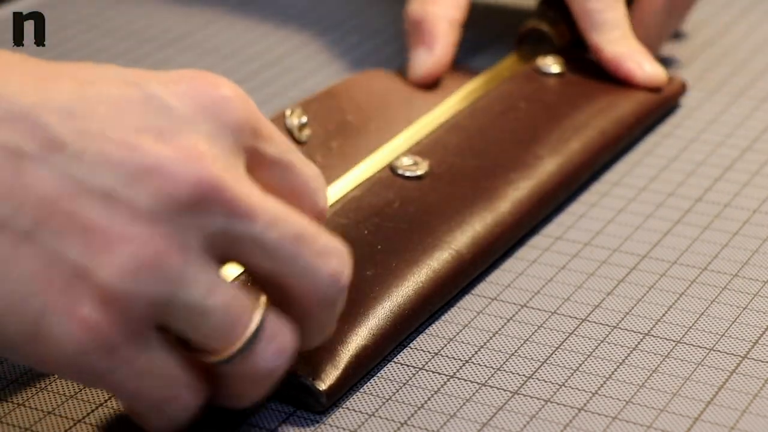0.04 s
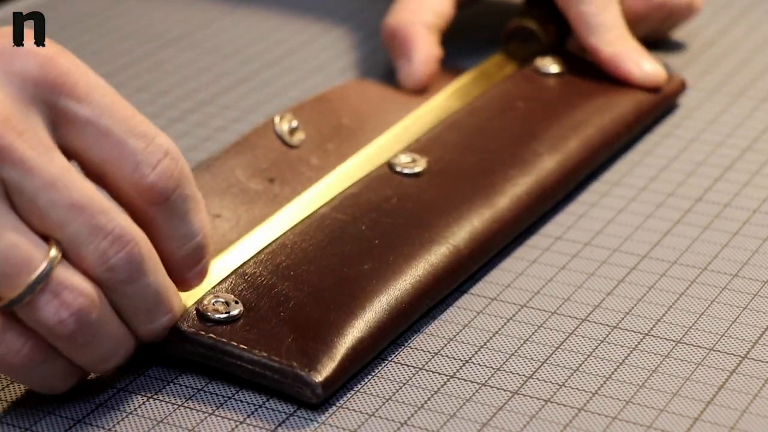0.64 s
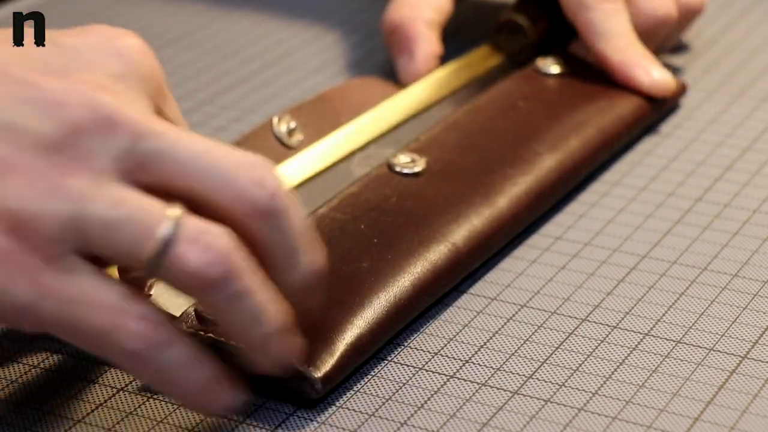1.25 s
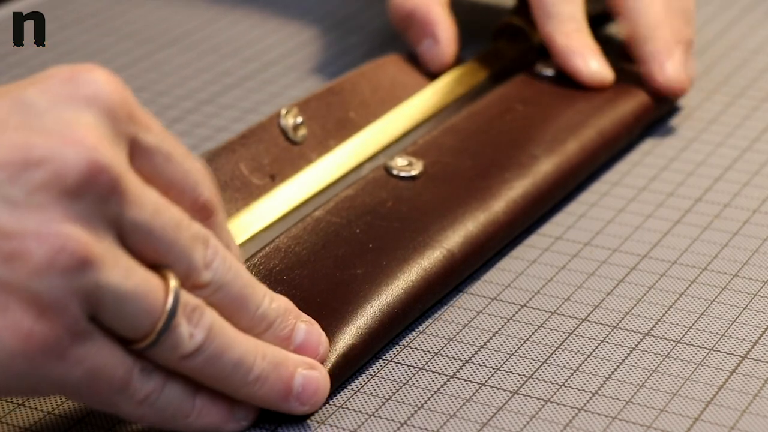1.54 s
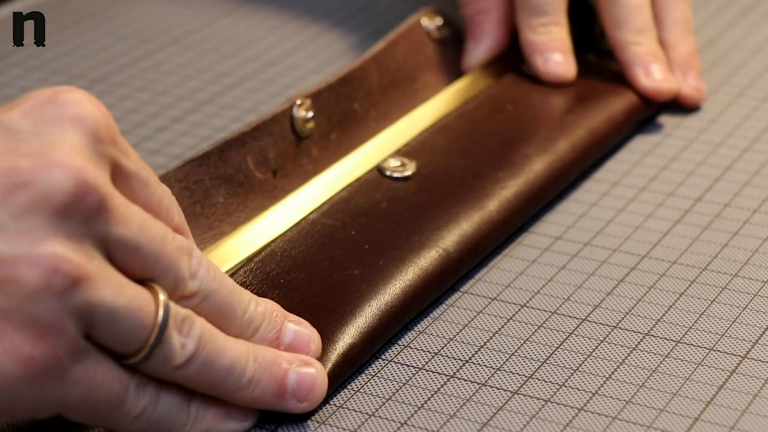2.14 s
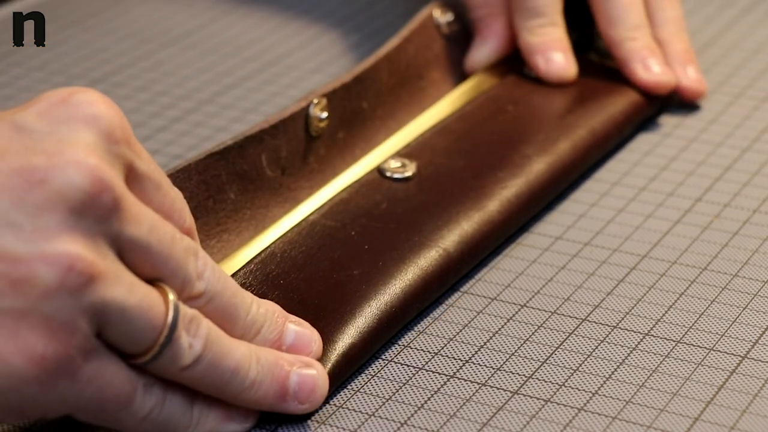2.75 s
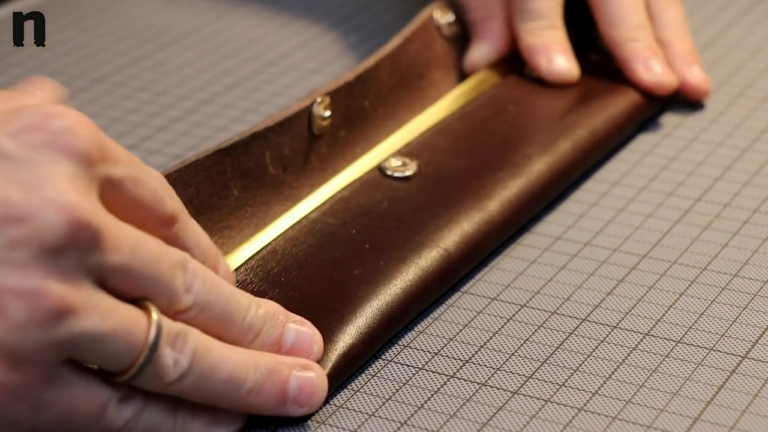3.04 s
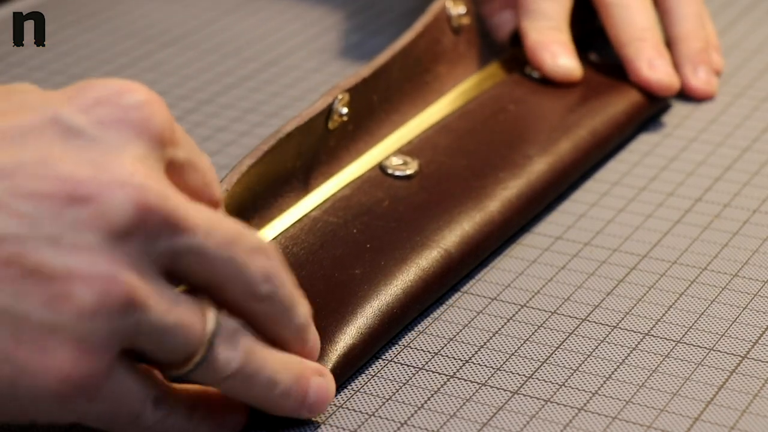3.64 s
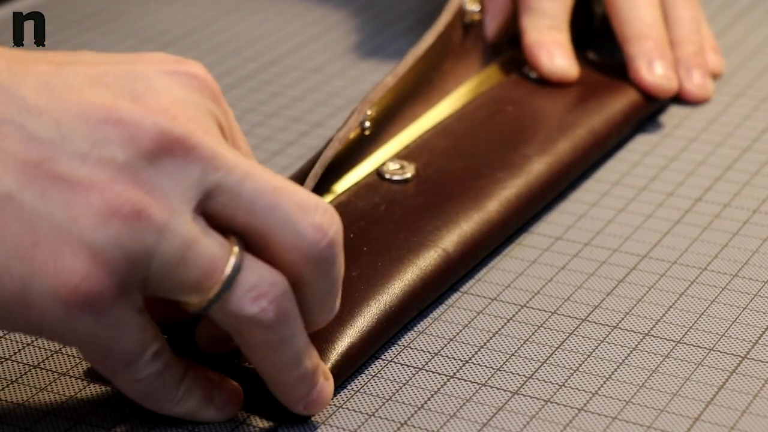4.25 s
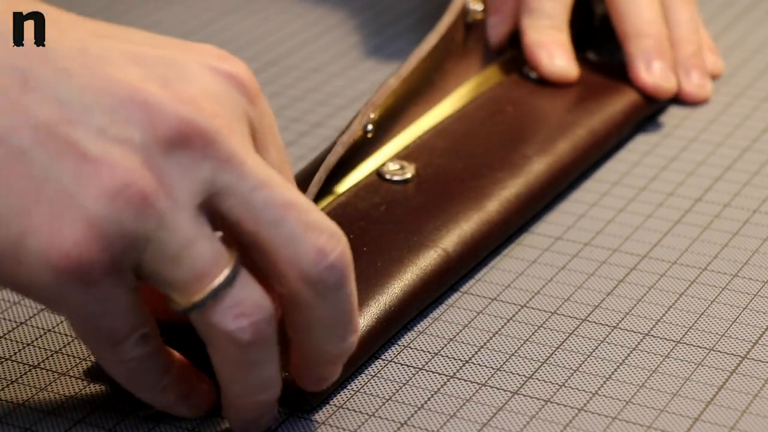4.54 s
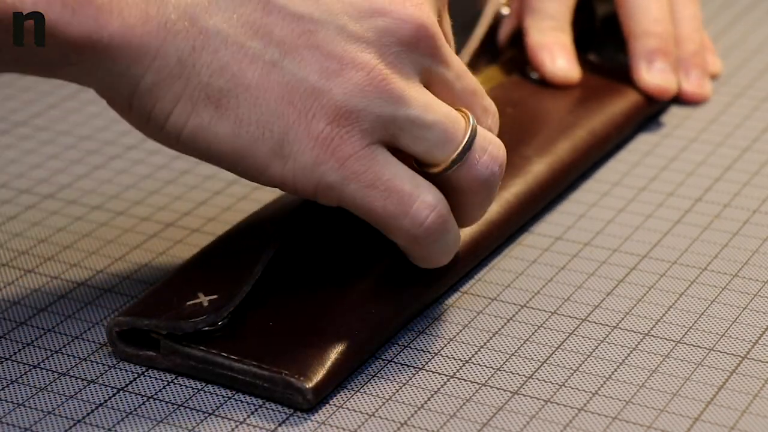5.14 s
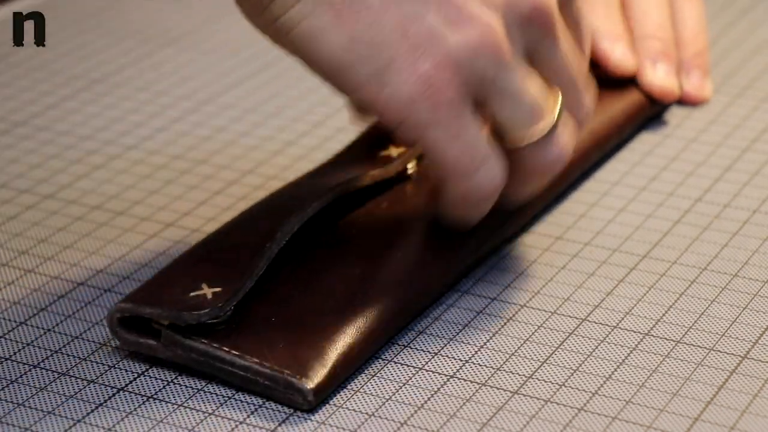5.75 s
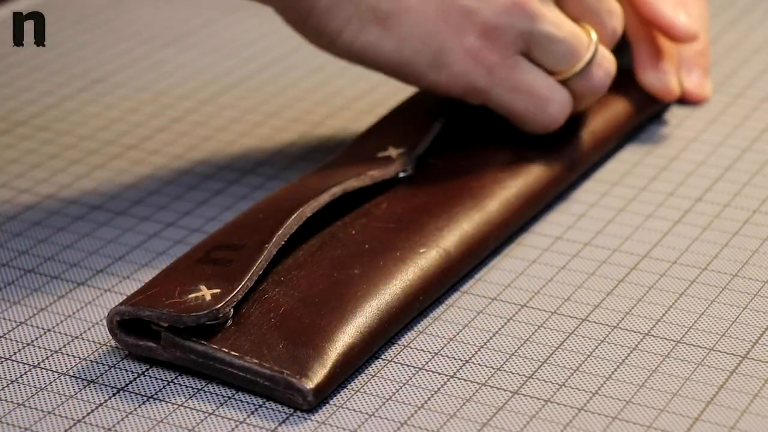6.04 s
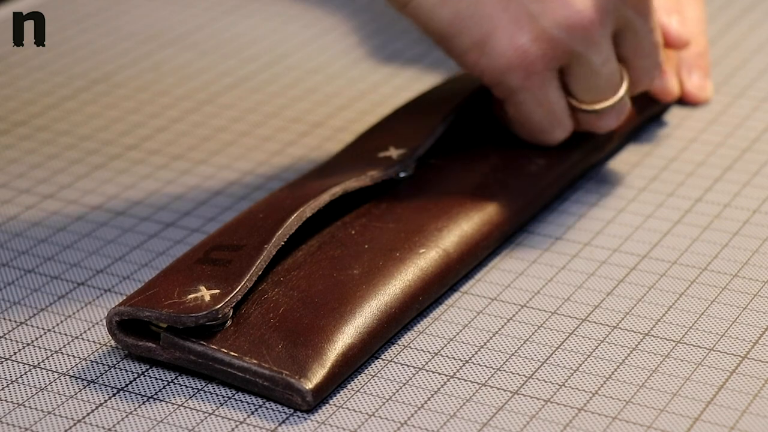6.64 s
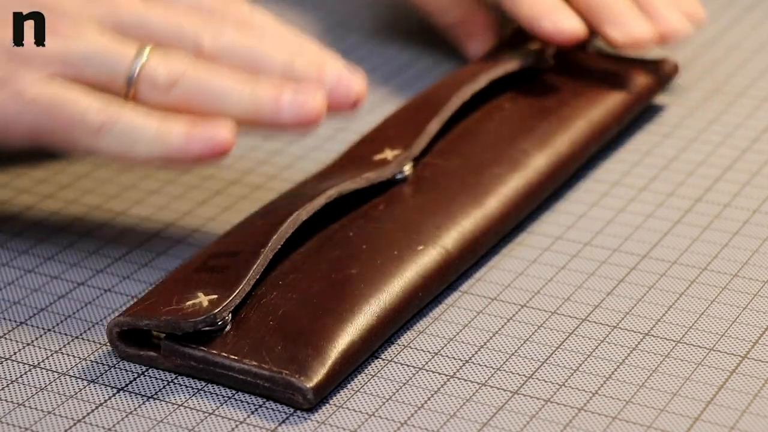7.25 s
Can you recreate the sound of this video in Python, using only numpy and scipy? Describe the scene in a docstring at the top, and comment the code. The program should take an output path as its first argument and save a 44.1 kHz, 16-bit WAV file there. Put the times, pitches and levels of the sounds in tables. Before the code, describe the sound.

A saw blade clinks lightly as it settles into a leather sheath, while hands brush and tap the leather and shift it on a mat. In the second half, three press studs are closed one after another with sharp clicks, the last the loudest, and a hand knocks the sheath once more. The microphone is close, in a small workshop with a quiet hum and a slight echo.

```python
"""Fingers rub and pat a leather sheath on a cutting mat, close up; the brass-backed saw inside clinks
as it settles. Skin slips on the grain, bent leather ticks, the blade scrapes and the sheath rumbles
on the mat. Then three press studs snap shut one by one, each spring slamming its cap home.
A small workshop with a low hum answers each click."""
import sys
import numpy as np
from scipy import signal
from scipy.fft import rfft, irfft
from scipy.io import wavfile
from scipy.ndimage import uniform_filter1d, map_coordinates

SR = 44100
rng = np.random.default_rng(int(sys.argv[2]) if len(sys.argv) > 2 else 0)


def digitize_waveform(pressure):
    """Quantize a signal to 16-bit integers and store it at the path in sys.argv[1].

    Rows of a 2-D input are taken as channels; values are limited to [-1, 1].
    """
    field = np.atleast_2d(pressure).T
    bounded = np.clip(field, -1, 1)
    quanta = np.round(bounded * 32767).astype(np.int16)
    wavfile.write(sys.argv[1], SR, quanta)


N = 321922
GRID_HZ = np.fft.rfftfreq(4096, 1 / SR)


# stud closures: t/s, level/dB, contact t60/s, room send/dB
SNAPS = [(4.5401, -12.5, .015, -7), (5.5883, -6, 0.0055, -7), (6.6914, -3, 0.0048, -10)]
# per stud, with the leather and air around it: f/Hz, half width/Hz, level/dB
STUD_MODES = [
    [(330, 480, -16), (1220, 130, -2), (1590, 260, -3), (2800, 430, -11), (3420, 520, -12.5),
     (4470, 160, -12), (6330, 830, -14), (8330, 1060, -8), (9660, 360, -10), (11200, 750, -6.5),
     (13260, 920, -13)],
    [(290, 150, -15), (917, 130, -1.5), (1180, 210, -0.5), (1700, 460, -8), (3030, 210, -2.5),
     (3630, 190, -3), (4270, 420, -1), (5220, 530, -2.5), (6310, 880, -5), (7640, 220, -6),
     (9070, 2200, -10), (13400, 1110, -4)],
    [(264, 26, -11.5), (860, 133, -4.5), (1325, 130, 1), (1550, 290, -4.5), (2300, 170, -13),
     (2770, 260, -7.5), (3470, 410, -5.5), (4270, 430, -6), (5650, 160, -8.5), (7800, 1050, -7.5),
     (9150, 720, -12.5), (13400, 2300, -13)],
]
# slightly thinner low end of every snap: f/Hz, level/dB
STUD_TILT = [(320, 0.5), (450, 1.5), (620, 3.5)]

def studs():
    """The spring of each stud jumps over its post and slams the cap home."""
    out = np.zeros(N)
    for (s, db, t60, wet_db), modes in zip(SNAPS, STUD_MODES):
        snap = contact(resonances(modes) * colour(STUD_TILT), t60)
        add(out, s, in_room(amp(db) * snap, wet_db))
    return out


# cap on its post: f/Hz, half width/Hz, level/dB
CAP_MODES = [(1330, 270, -1), (1870, 140, 2), (3040, 530, -10), (4200, 180, -14)]

def cap_seating():
    """The last cap finds its post with a small dry click before it is pressed home."""
    out = np.zeros(N)
    click = amp(-20.5) * contact(resonances(CAP_MODES), t60=0.0014)
    add(out, s=6.027, x=in_room(click, wet_db=-14))
    return out


# fingers and flap landing: t/s, relative level/dB, thump trim/dB, contact t60/s
PATS = [(0.096, -26, -32, 0.031), (.115, -21.5, -30, 0.045), (0.271, -33.5, -8.5, 0.017),
        (.987, -26, -16, 0.014), (1.152, -33, -28, 0.015), (1.458, -18.5, -23.5, 0.059),
        (1.513, -29.5, -22, 0.031), (1.889, -33, -23, 0.023), (1.898, -30, -27, 0.018),
        (2.108, -35.5, -12, 0.036), (3.152, -33.5, -59, 0.026), (3.23, -39, -8, .02),
        (4.207, -38, -18, 0.02), (4.4182, -23.5, -13.5, 0.028), (4.694, -38, -14, .015),
        (4.969, -35.5, -10.5, 0.046), (4.999, -36, -25, 0.014), (5.132, -34, -12, 0.026),
        (5.454, -31.5, -18.5, 0.0067), (5.745, -31, -17, 0.0096), (6.487, -39, -27, .015),
        (6.548, -31, -34, 0.023), (6.565, -31, -19, 0.0095), (6.824, -31, -39, 0.024),
        (6.977, -32, -13, 0.047), (7.001, -38, -9.5, 0.039), (7.273, -34, -18, 0.014),
        (7.292, -23, -12.5, 0.017), (7.296, -14, -9.5, .012)]
# leather knock, mat thump and grain crackle: f/Hz, level/dB
LEATHER_SPECTRUM = [(200, -44), (500, -25), (800, 5.5), (1050, 1.5), (1450, 3.5), (1800, -4), (2250, -12),
                    (2800, -23.5), (4200, -12), (8000, -65), (16000, -56)]
MAT_SPECTRUM = [(40, -47), (100, -15.5), (170, 6.5), (300, -5), (450, -6.5), (900, -21.5), (3000, -93)]
CRACKLE_SPECTRUM = [(1000, 1.5), (3000, 1.5), (4500, 1.5), (7000, -5), (8700, 3.5), (10500, -15),
                    (13500, -6), (16000, -25)]

def pats():
    """Each pat knocks the stiff leather, thumps the mat under it and crackles on the grain."""
    out = np.zeros(N)
    for s, db, thump_db, t60 in PATS:
        # the knock deepens as the studs close the sheath
        pitch_ratio = np.interp(s, [SNAPS[0][0], SNAPS[-1][0]], [1.06, 0.85])
        pitch_ratio *= np.exp(0.035 * rng.standard_normal())
        knock = contact(colour(np.multiply(LEATHER_SPECTRUM, [pitch_ratio, 1])), t60)
        thump = amp(thump_db + 15.5) * contact(colour(MAT_SPECTRUM), t60=0.031)
        crackle = amp(-12.5) * contact(colour(CRACKLE_SPECTRUM), t60)
        add(out, s, in_room(amp(db - 3.5) * (knock + thump + crackle), wet_db=-8.5))
    return out


# saw knocking against a stud: t/s, level/dB
CLINKS = [(0.4415, -23.5), (0.5511, -30), (0.677, -41.5), (0.794, -42.5)]
# blade modes: f/Hz, level/dB, t60/s
BLADE_MODES = [(2370, -5, 0.02), (2820, -14, 0.019), (3550, -14.5, 0.022), (3560, 1.5, 0.018),
               (3690, -10, 0.051), (4030, -16, .016), (4230, -4.5, 0.024), (4640, -16, 0.026),
               (5350, -13, 0.014), (7300, -29, 0.026), (8920, -27.5, 0.013)]

def saw_clinks():
    """The blade rings briefly, damped by the leather; a moment later its weight thuds on the bench."""
    out, t = np.zeros(N), np.arange(SR // 4) / SR
    bench = resonances([(352, 116, 0)])
    attack = 1 - np.exp(-t / 0.00044)
    for s, db in CLINKS:
        ring = np.zeros(len(t))
        for hz, mode_db, t60 in BLADE_MODES:
            decay = amp(mode_db + rng.normal(0, 1.5) - 60 * t / t60)
            ring += decay * np.sin(2 * np.pi * (hz * t + rng.random()))
        add(out, s, in_room(amp(db) * ring * attack, wet_db=-11))
        thud = amp(db + 1.5) * contact(bench, t60=0.02)
        add(out, s + 0.0041, in_room(thud, wet_db=-8))
        knock = amp(db - 9) * contact(colour(LEATHER_SPECTRUM), t60=0.014)
        add(out, s + 0.002, in_room(knock, wet_db=-4))
        clack = amp(db - 12.5) * contact(colour(CRACKLE_SPECTRUM), t60=0.008)
        add(out, s, in_room(clack, wet_db=-6))
    return out


# fingers and flap sliding: start/s, end/s, level/dB, relative hiss/dB
STROKES = [(0, 0.062, -54.5, -2), (0.055, .142, -49.5, -2), (0.26, 0.404, -59, -2), (0.543, 0.597, -51, -2),
           (.673, 0.877, -56.5, -1), (0.876, 0.987, -45, -4), (1.063, 1.1, -56, -1),
           (1.226, 1.387, -53, -2.5), (1.419, 1.84, -48, -2), (1.998, 2.038, -49.5, -2),
           (2.125, 2.223, -53.5, -0.5), (2.325, 2.4, -48.5, -1), (2.944, 3.003, -50.5, -7),
           (3.311, 3.455, -58.5, 3), (3.865, 3.943, -56, -4), (4.692, 4.74, -57, 0.5),
           (5.053, 5.078, -45, -9.5), (5.254, 5.6, -55, -13), (5.756, 6, -46.5, -5.5),
           (6.009, 6.22, -54.5, -7), (6.324, 6.387, -48.5, -16), (6.722, 6.91, -53.5, -3),
           (7.057, 7.22, -59, 0)]

def hand_motion():
    """Envelopes of the rub's body and hiss: a skid around each pat, strokes and fidgeting at rest."""
    land_s, lift_s = 0.018, 0.04
    attack_s, release_s, sag_db_per_s = 0.019, 0.015, 23
    t = np.arange(0, N / SR, 0.001)
    body_power = np.zeros(len(t))
    for s, db, *_ in PATS:
        falloff = np.maximum((s - t) / land_s, (t - s) / lift_s).clip(0, 20)
        skid = amp(db - 22.5) * np.exp(-falloff)
        body_power += skid ** 2
    hiss_power = amp(-8) ** 2 * body_power
    for start, end, db, hiss_db in STROKES:
        sag_db = sag_db_per_s * np.clip(t - start, 0, end - start)  # the stroke slows
        rise = np.clip(0.5 + (t - start) / attack_s, 0, 1)
        fall = np.clip(0.5 + (end - t) / release_s, 0, 1)
        stroke = amp(db - sag_db) * rise * fall
        body_power += stroke ** 2
        hiss_power += (amp(hiss_db) * stroke) ** 2
    rest = amp(-70.5 + wobble(rate_hz=8.2))
    return [np.sqrt(rest ** 2 + np.interp(np.arange(N) / SR, t, power))
            for power in (body_power, hiss_power)]


# rubbed sheath, hollow body and surface hiss: f/Hz, level/dB
RUB_BODY = [(100, -43), (200, 6), (330, -0.5), (560, -3.5), (800, 0.5), (1030, -3), (1220, -3), (1520, 1),
            (1850, -7), (2300, -20.5), (4000, -26.5), (9000, -52)]
RUB_HISS = [(800, -71), (2000, 2.5), (2700, 1.5), (3300, -2), (4300, -1.5), (5300, -4.5), (6800, -5),
            (8200, -2), (9100, -3.5), (10200, -16), (13200, -8), (16000, -25)]

def rubbing():
    """Skin catches and slips on the grain: tiny slips sound the hollow sheath and hiss at its surface."""
    body_level, hiss_level = hand_motion()
    grip_db = 2.0 * wobble(rate_hz=69)
    slips = unit(impulses(per_s=330))
    body = patchy(causal(0.75 * slips + rng.standard_normal(N), colour(RUB_BODY)), depth_db=1.5)
    hiss = patchy(causal(0.31 * slips + rng.standard_normal(N), colour(RUB_HISS)), depth_db=3.5)
    rub = body_level * amp(grip_db - 0.5) * body + hiss_level * amp(0.87 * grip_db) * hiss
    grain_ticks = unit(causal(impulses(per_s=160), colour(CRACKLE_SPECTRUM)))
    return in_room(rub + amp(-8.5) * hiss_level * grain_ticks, wet_db=-7.5)


# ticks of the bending grain: t/s, level/dB
CREASES = [(.61, -36), (3.229, -41.5), (4.293, -38), (4.4207, -32), (4.735, -42.5), (5.352, -44),
           (5.373, -41), (5.758, -37.5), (5.957, -40), (6.274, -41.5), (6.548, -40.5), (6.566, -41),
           (6.658, -40.5), (6.978, -41)]

def creases():
    """Bent leather gives way in a bright tick that faintly knocks the sheath."""
    out = np.zeros(N)
    for s, db in CREASES:
        tick = contact(colour(CRACKLE_SPECTRUM), t60=0.014)
        knock = amp(-7.5) * contact(colour(LEATHER_SPECTRUM), t60=0.014)
        add(out, s, in_room(amp(db) * (tick + knock), wet_db=-3.5))
    return out


# sheath moving on the mat: centre t/s, length/s, level/dB, f/Hz
SHIFTS = [(0.117, 0.12, -47, 174), (0.526, 0.1, -62, 336), (0.905, 0.38, -52.5, 172),
          (1.611, 0.086, -48.5, 247), (4.195, .2, -52.5, 100), (4.48, 0.048, -50, 151),
          (4.83, 0.3, -51.5, 139), (4.981, 0.032, -35, 131), (5.797, 0.41, -51, 271)]

def shifting():
    """Pressed and dragged, the sheath rumbles softly on the mat."""
    out, t = np.zeros(N), np.arange(SR) / SR - 0.5
    for s, length_s, db, hz in SHIFTS:
        band = 1 / (1 + (4 * np.log((GRID_HZ + 1) / hz)) ** 4)
        rumble = amp(db) * swell(t, length_s) * unit(causal(rng.standard_normal(SR), band))
        before_start = max(round((0.5 - s) * SR), 0)
        add(out, s - 0.5, rumble[before_start:])
    return out


# blade sliding on leather: centre t/s, length/s, level/dB
SCRAPES = [(0.57, 0.058, -63), (0.734, 0.16, -63.5), (3.08, 0.047, -63), (3.276, 0.1, -61),
           (4.016, 0.056, -61), (4.535, 0.019, -49), (4.582, 0.06, -64), (7.115, 0.13, -62)]

def scraping():
    """Friction keeps the modes of the blade sounding, broadened by the leather pressing on it."""
    t = np.arange(N) / SR
    half_width_hz = 320
    blade = resonances([(hz, half_width_hz, 0.36 * db) for hz, db, _ in BLADE_MODES])
    envelope = sum(amp(db) * swell(t - s, length_s) for s, length_s, db in SCRAPES)
    return envelope * patchy(causal(rng.standard_normal(N), blade), depth_db=2.5)


# hum tones: f/Hz, level/dB
HUM_TONES = [(61, -61.5), (86, -64.5), (165, -71.5)]
# room and microphone noise: f/Hz, relative level/dB
AIR_SPECTRUM = [(12, -65), (20, -13.5), (65, -1), (110, -12.5), (145, -3), (221, -13.5), (284, -8),
                (326, -18.5), (375, -13), (443, -21.5), (603, -23), (655, -24), (1690, -32.5), (11000, -33),
                (15800, -33.5)]

def workshop():
    """A low, wavering hum over steady air noise."""
    hum, t = np.zeros(N), np.arange(N) / SR
    for hz, db in HUM_TONES:
        waver = 1 + 0.52 * wobble(rate_hz=15)
        phase = 2 * np.pi * hz * t + 0.46 * wobble(rate_hz=4.1)
        hum += amp(db) * unit(waver * np.sin(phase))
    air = unit(causal(rng.standard_normal(N), colour(AIR_SPECTRUM)))
    return hum + amp(-51.5 - 0.3) * air


# decay of the wall reflections: f/Hz, t60/s
WALL_DECAY = [(150, 1), (900, 0.34), (1600, 0.21), (3000, 0.27), (8000, 0.21), (15000, 0.19)]

def in_room(x, wet_db):
    """x plus reflections from the near bench and the far walls, where the bass lingers longest."""
    hz, t, noise = signal.stft(rng.standard_normal(SR // 4), SR, nperseg=256)
    walls = amp(-60 * t / along(WALL_DECAY, hz)[:, None])
    bench = 0.79 * amp(-60 * t / 0.033)
    tail = signal.istft(noise * (walls + bench), SR, nperseg=256)[1]
    tail *= 1 - np.exp(-(np.arange(len(tail)) / SR / 0.00077) ** 2)
    response = amp(wet_db) * tail / np.linalg.norm(tail)
    response[0] = 1  # direct sound
    return signal.fftconvolve(x, response)[:N]


def contact(gain, t60):
    """A brief rough contact into a damped body, with the energy of one millisecond at level 1."""
    t = np.arange(2 * (len(GRID_HZ) - 1)) / SR
    burst = rng.standard_normal(len(t)) * amp(-60 * t / t60) * (1 - np.exp(-20 * t / t60))
    # a sharp blow drives all frequencies about equally
    power = np.abs(uniform_filter1d(np.abs(rfft(burst)) ** 2, size=14)) + 1e-9
    x = causal(burst, gain / np.sqrt(power))
    return x / np.linalg.norm(x) * np.sqrt(SR / 1000)


def patchy(x, depth_db):
    """The colour of x drifts as the point of contact moves; rms 1."""
    spectra = signal.stft(x, nperseg=512)[2]
    drift = uniform_filter1d(rng.standard_normal(spectra.shape), size=7, axis=0)
    drift = uniform_filter1d(drift, size=14, axis=1)
    return unit(signal.istft(spectra * amp(depth_db * unit(drift)), nperseg=512)[1][:N])


def causal(x, gain):
    """x through a unit-energy minimum-phase filter shaped like gain on GRID_HZ."""
    cepstrum = irfft(np.log(gain))
    half = len(cepstrum) // 2
    cepstrum[1:half] *= 2
    cepstrum[half + 1:] = 0
    response = irfft(np.exp(rfft(cepstrum)))
    return signal.fftconvolve(x, response / np.linalg.norm(response))[:len(x)]


def resonances(modes):
    """Gain on GRID_HZ of (f/Hz, half width/Hz, level/dB) modes."""
    return np.sqrt(sum((amp(db) / (1 + ((GRID_HZ - hz) / width) ** 2)) ** 2 for hz, width, db in modes))


def colour(spectrum):
    """Gain on GRID_HZ of (f/Hz, level/dB) points."""
    return amp(along(spectrum, GRID_HZ))


def along(points, hz):
    """(f/Hz, value) points read on a log axis."""
    knots_hz, values = np.transpose(points)
    return np.interp(np.log(hz + 1), np.log(knots_hz + 1), values)


def impulses(per_s):
    """Impulses of random time and size."""
    return (rng.random(N) < per_s / SR) * rng.standard_normal(N)


def wobble(rate_hz):
    """A smooth random curve with knots at rate_hz."""
    knots = rng.standard_normal(int(N * rate_hz / SR) + 4)
    return map_coordinates(knots, [np.arange(N) * rate_hz / SR])


def swell(t, length_s):
    """Gaussian rise and fall around t = 0."""
    return np.exp(-2 * (t / length_s) ** 2)


def add(track, s, x):
    """Mix x into the track from time s."""
    part = track[max(round(s * SR), 0):][:len(x)]
    part += x[:len(part)]


def amp(db):
    """Decibels to gain."""
    return 10 ** (np.asarray(db) / 20)


def unit(x):
    """x at rms 1."""
    return x / np.sqrt(np.mean(x ** 2) + 1e-20)


def scene():
    """One microphone feeds both channels, which differ only by a trace of hiss."""
    handling = rubbing() + shifting() + scraping() + pats() + creases()
    mono = handling + saw_clinks() + cap_seating() + studs() + workshop()
    hiss = amp(-63.5) * rng.standard_normal(N)
    return np.array([mono + hiss, mono - hiss])


def record(dry):
    """Soft clipping near full scale, then a steep low-pass."""
    cutoff_hz = 15900
    clipped = dry / (1 + np.abs(dry) ** 6) ** (1 / 6)
    return signal.sosfilt(signal.ellip(10, 0.1, 80, cutoff_hz, fs=SR, output="sos"), clipped)


dry = scene()
out = record(dry)
digitize_waveform(out)
```